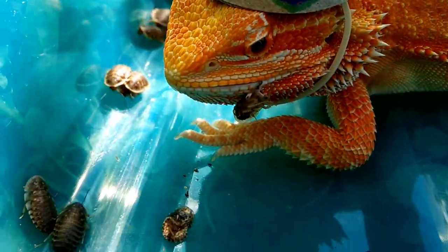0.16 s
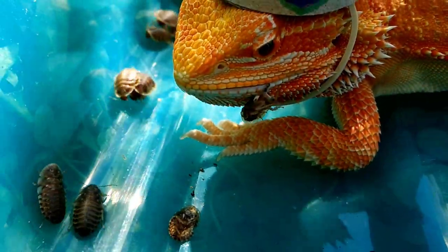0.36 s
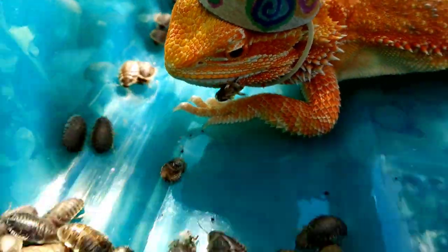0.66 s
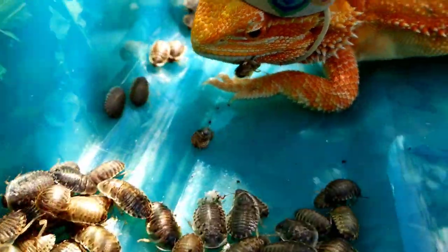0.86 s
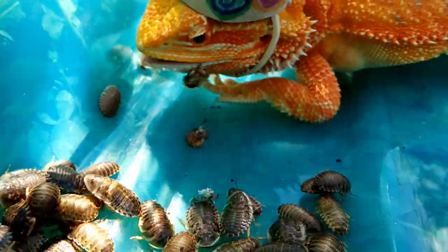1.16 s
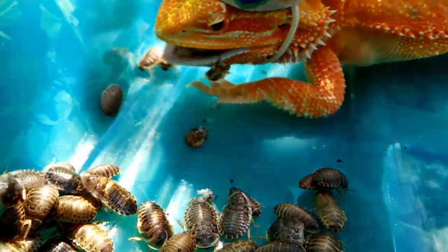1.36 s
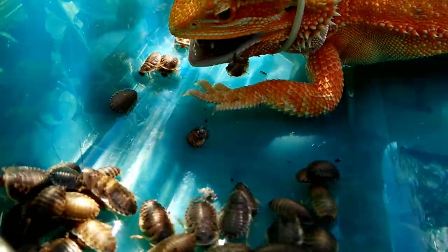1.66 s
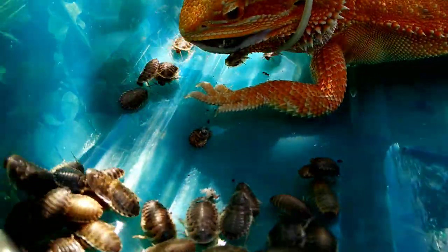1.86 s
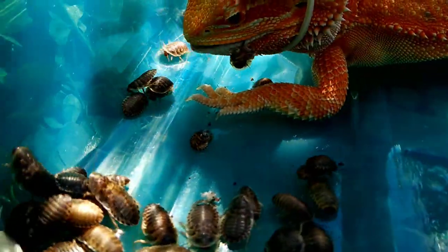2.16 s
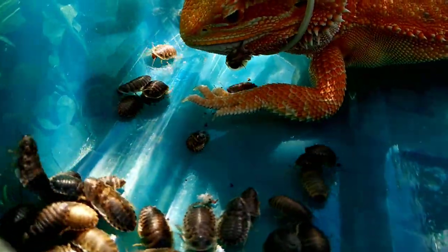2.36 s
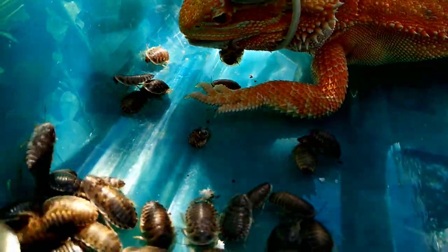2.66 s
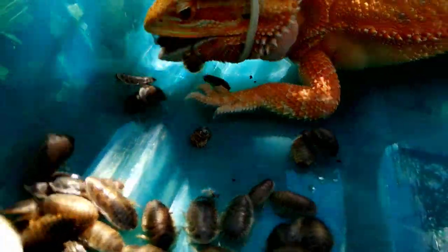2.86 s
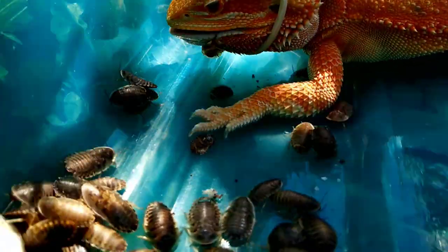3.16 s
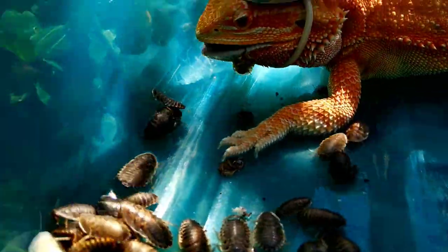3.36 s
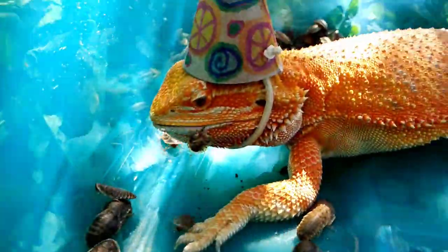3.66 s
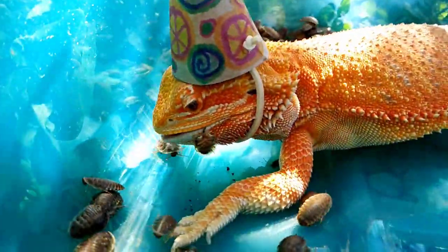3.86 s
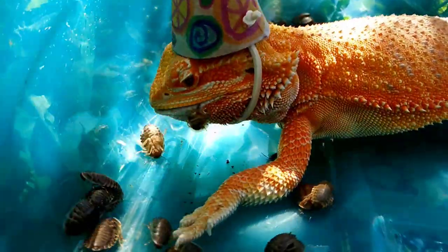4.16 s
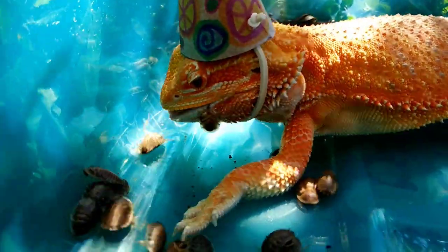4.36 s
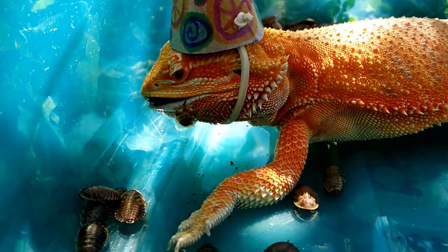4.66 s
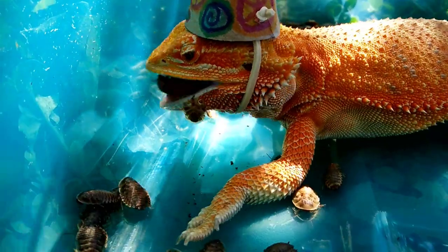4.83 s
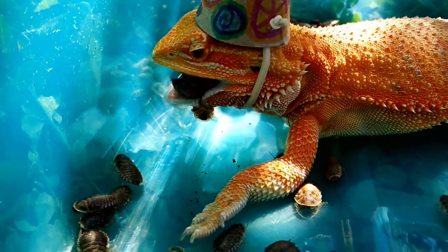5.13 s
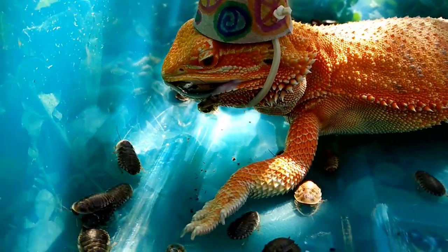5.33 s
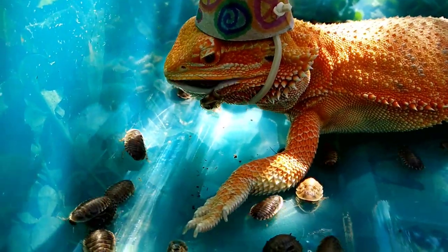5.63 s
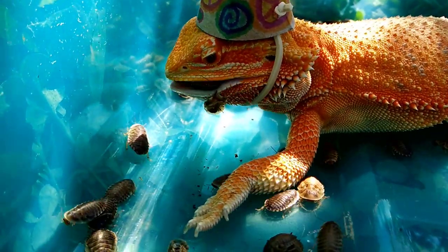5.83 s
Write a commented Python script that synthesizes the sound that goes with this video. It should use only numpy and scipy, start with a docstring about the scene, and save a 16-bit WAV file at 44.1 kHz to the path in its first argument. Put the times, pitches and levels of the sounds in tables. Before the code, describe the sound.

Faint insect leg ticks patter continuously on plastic near a hand-held camera. Crisp shell cracks come singly and in tight pairs, clustering just after three seconds, when fingers also thump and scrape the camera body. Isolated snaps return near five seconds. The quiet indoor room sounds small and dry, with soft microphone hiss, a low rumble and uneven handling noise between the channels.

```python
"""Plastic tub, close to a hand-held camera: a lizard crunches hard-shelled insects while others scuttle about.
Cracks and leg ticks are noise bursts and tiny impacts ringing shell and tub-wall resonances.
Fingers knock the camera body (pulse plus low thump), mostly near one microphone port, and rub it (lumpy noise).
Shaped noise gives the room rumble and the microphone hiss."""
import sys
import numpy as np
from scipy import signal
from scipy.fft import rfft, irfft, next_fast_len
from scipy.io import wavfile
from scipy.ndimage import uniform_filter1d, map_coordinates

SR = 44100
rng = np.random.default_rng(int(sys.argv[2]) if len(sys.argv) > 2 else 0)


def decibels_to_gain(level_db):
    """Convert a level in decibels to a linear amplitude gain (20 dB per decade)."""
    exponent = np.asarray(level_db, float) / 20
    return 10 ** exponent


def put_to_file(sound):
    """Save the sound as 16-bit audio at rate SR, in the file named by the first command-line argument."""
    columns = np.atleast_2d(sound).T  # one column per channel
    safe = np.clip(columns, -1, 1)
    whole_steps = np.round(safe * 32767)
    wavfile.write(sys.argv[1], SR, whole_steps.astype(np.int16))


N = 264379

# room rumble spectrum: (frequency [Hz], relative level [dB])
RUMBLE_SPECTRUM = [(18, -60.5), (30, -18.5), (77, 1.5), (108, 4.5), (237, -14.5), (377, -16), (447, -16.5),
                   (530, -32), (732, -13), (1040, -32), (1200, -43.5), (1560, -64.5), (2640, -120)]
# rumble, left-right correlation: (frequency [Hz], correlation [-1..1])
RUMBLE_LIKENESS = [(60, 0.6), (250, 1), (750, 0.83)]
# thuds of the hand, spectrum: (frequency [Hz], relative level [dB])
THUD_SPECTRUM = [(18, -46.5), (30, -35), (46, -12), (75, 2), (119, -12), (179, -6), (216, -7.5), (400, -39),
                 (520, -50.5), (880, -120)]
# skin rubbing plastic, spectrum: (frequency [Hz], relative level [dB])
RUB_SPECTRUM = [(150, -27), (250, -9.5), (583, -2), (1240, -12), (1860, -20.5), (2920, -25.5), (4000, -24),
                (5200, -27.5), (8800, -120)]
# fingers sliding on the camera: (start [s], length [s], rub level [dB], left-right [dB])
STROKES = [(0.49, 0.3, -58.5, -1), (3.32, 0.093, -54.5, -5.5), (3.483, 0.038, -52, -3),
           (3.556, 0.14, -45, -15.5), (3.773, 0.021, -53, -5), (4.256, 0.018, -59.5, -1),
           (4.316, 0.06, -52.5, -12)]
# insect legs and grinding jaws: (time [s], bright level [dB], dull level [dB], left-right [dB])
SCUTTLE = [(0.0, -69.5, -84, -4), (0.4, -69.5, -87, -10), (0.65, -67.5, -78, 2.5), (1.13, -69, -77, -12.5),
           (1.17, -64, -64, -2), (1.27, -64, -63.5, 1), (1.33, -67.5, -74.5, -1), (2.08, -65.5, -80, -3.5),
           (2.64, -69.5, -96, -6), (2.98, -64.5, -68, -4), (3.26, -67.5, -67, -1), (3.3, -52, -69, 3),
           (3.43, -65.5, -80, -1), (3.55, -62, -72, 0), (3.87, -68, -69, 1.5), (4.15, -68.5, -76, -2),
           (4.34, -66.5, -59, -2.5), (4.6, -67, -78, -8), (4.7, -62, -64, -2), (4.85, -68, -75.5, -5),
           (5.22, -64, -70.5, -5), (5.99, -70, -72.5, -6)]
# dense bed of leg ticks, spectrum: (frequency [Hz], relative level [dB])
LEG_BED_SPECTRUM = [(1650, -42.5), (2800, -1.5), (3400, -6), (4920, 4), (5320, 4.5), (6350, 3),
                    (7510, -6.5), (8040, -24), (9350, -12.5), (9750, -42), (12700, -71), (21400, -120)]
# shell resonances: (centre [Hz], width [Hz], level [dB])
SHELL_MODES = [(3440, 1100, -1), (4214, 286, 5.5), (5075, 280, -1), (5870, 350, 2), (6330, 2600, -4.5)]
# dull tub-wall resonances: (centre [Hz], width [Hz], level [dB])
TUB_MODES = [(414, 51, 4), (777, 113, 2.5), (1423, 57, -0.5), (1826, 117, -3.5), (2430, 303, -2),
             (3005, 410, -10)]
# finger knocks on the camera body:
# (time [s], pulse peak [dB], nominal pulse pitch [Hz], thump level [dB], left-right [dB])
KNOCKS = [(0.303, -42.5, 570, -42.5, -36), (0.503, -45, 540, -39, -26), (0.5796, -33.5, 744, -46.5, -40),
          (0.6146, -27, 1050, -35, 6.5), (0.765, -34.5, 324, -39, 12), (2.3831, -31, 1080, -26.5, -25),
          (3.4454, -26, 323, -24, 2.5), (3.4962, -32.5, 440, -31, -35), (3.5033, -30, 685, -36.5, -4.5),
          (3.5715, -15.5, 1060, -34.5, -29), (3.6369, -31, 580, -27.5, -13), (3.7043, -21, 530, -39, -7),
          (3.7696, -16, 576, -32.5, -6.5), (3.7838, -29, 565, -40, -22), (4.2927, -39.5, 1200, -58, -3),
          (4.3116, -32.5, 560, -44, -30), (4.384, -20.5, 680, -30.5, -20), (5.016, -39, 520, -47, -44),
          (5.1504, -39.5, 450, -45.5, -33)]
# shells cracking and claws or nails ticking:
# (time [s], bright peak [dB], dull peak re bright [dB], ring pitch [Hz], left-right [dB])
CRACKS = [(0.6144, -24.5, -11.5, 4830, 49), (0.764, -47.5, -0.5, 5540, 14), (1.0122, -52.5, 7.5, 4450, 6),
          (1.065, -42, -4, 6020, -4), (1.1566, -46.5, 4, 4130, 1.5), (1.182, -57, 14.5, 5100, 7),
          (1.229, -47.5, 1, 5200, 8), (1.2439, -44.5, 2, 4100, -29), (1.2957, -40.5, -26, 4700, 9),
          (1.542, -40.5, -19.5, 5080, 14), (1.548, -32.5, -16, 4820, 3.5), (1.771, -58, 6.5, 3430, -1),
          (1.836, -50.5, 0, 3500, 3), (1.8711, -27, -24, 5000, 6), (1.8757, -30.5, -24, 4330, 8.5),
          (1.8947, -45, -2, 3870, -7), (1.9069, -23, -6, 4180, 3.5), (2.336, -37, -14, 3800, 8),
          (2.765, -44, -33, 5800, 1), (2.973, -42, -5.5, 4740, -4), (2.9845, -36.5, 0.5, 4250, 0.5),
          (3.274, -43, 8, 3520, -5), (3.285, -22, -22, 5360, 6.5), (3.2952, -25.5, -16, 5230, -3.5),
          (3.3114, -35, -17, 4500, -5), (3.3288, -36.5, -4, 5040, 12), (3.3468, -23.5, -9, 5050, 3.5),
          (3.5029, -30, -2, 4300, -7), (3.5686, -33.5, 10, 3530, -15), (3.613, -35, -10, 5960, 2),
          (3.702, -21.5, -5.5, 4260, 9), (3.7689, -32.5, 1, 6700, 16.5), (4.161, -49, -4.5, 4400, 10),
          (4.309, -38, 12, 3250, -2), (4.3824, -25.5, -7, 4560, -5), (4.4324, -39.5, -15, 5600, -5),
          (5.04, -43, -4.5, 4320, 8), (5.065, -23, -9, 4780, 2), (5.3741, -26, -11, 5500, -1.5),
          (5.3796, -29, -10, 4500, -3), (5.4279, -42.5, 4.5, 3240, 3), (5.745, -46.5, -20, 4220, 1)]
# overall response, with a dip near 8 kHz: (frequency [Hz], gain [dB])
OVERALL_RESPONSE = [(28, -19), (50, -9), (100, -5), (6500, 2), (7500, -4), (8200, -16), (9000, -5),
                    (9800, -23.5)]

GRIP_DB, GRIP_PAN_DB = -69, -1.5  # resting grip
STROKE_ATTACK_S, STROKE_RELEASE_T60_S = 0.0093, 0.48
THUD_AT_REST_DB, THUD_DB_PER_RUB_DB = -61, 0.74
# nominal thump pitch when pulse and thump match; it doubles per this many dB of pulse over thump
THUMP_HZ, THUMP_DOUBLES_DB = 149, 24.5
THUMP_T60_CYCLES = 13  # nominal
# spray decay at -35 dB before limits; halves per this many dB louder; halves at this left-right level
SPRAY_T60_S, SPRAY_HALVES_DB, NEAR_PORT_DB = 0.2, 8.5, 6
FAINT_PER_S = 4
FAINT_OVER_BUSTLE_DB, FAINT_DULL_DB, FAINT_HZ = 17, -10.5, 4900  # central values


def unit(x):
    """Scale to rms 1."""
    return x / np.sqrt(np.mean(x ** 2) + 1e-20)


def peak(x):
    """Scale to peak 1."""
    return x / np.abs(x).max()


def along(points, hz):
    """Interpolate (Hz, value) points on a log frequency axis."""
    f, v = np.transpose(points)
    return np.interp(np.log(hz + 1), np.log(f + 1), v)


def curves(rows):
    """One value per sample for each column after the time."""
    s, *cols = np.transpose(rows)
    return [np.interp(np.arange(N) / SR, s, c) for c in cols]


def wobble(knots_per_s):
    """Smooth random curve through normal knots."""
    knots = rng.standard_normal(int(N * knots_per_s / SR) + 4)
    return map_coordinates(knots, [np.arange(N) * knots_per_s / SR])


def filtered(x, response):
    """Apply a complex response of frequency."""
    m = next_fast_len(x.shape[-1] + 8192)
    spectrum = rfft(x, m) * response(np.fft.rfftfreq(m, 1 / SR))
    return irfft(spectrum, m)[..., :x.shape[-1]]


def resonances(modes):
    """Causal sum of (Hz, width Hz, dB) resonances of alternating sign."""
    def response(f):
        return sum((-1) ** k * decibels_to_gain(db) * 1j * f * w / (c * c - f * f + 1j * f * w)
                   for k, (c, w, db) in enumerate(modes))
    return response


def sides(pan_db):
    """Left and right gains of mean 1."""
    pair = decibels_to_gain(np.array([pan_db / 2, -pan_db / 2]))
    return 2 * pair / pair.sum(axis=0)


def add(track, s, sound):
    """Mix a short stereo sound in at s seconds."""
    track[:, round(s * SR):][:, :sound.shape[1]] += sound


def rush(spectrum, likeness, patchy_db):
    """Stereo noise of rms 1: random-gain time-frequency patches, given spectrum and left-right correlation."""
    z = signal.stft(rng.standard_normal((2, N)), nperseg=512)[2]
    field = uniform_filter1d(rng.standard_normal(z.shape[1:]), size=6, axis=0)
    field = uniform_filter1d(field, size=8, axis=1)
    pair = signal.istft(z * decibels_to_gain(patchy_db * unit(field)), nperseg=512)[1][:, :N]

    def mid_side_response(hz):
        angle = np.arccos(np.clip(along(likeness, hz), -1, 1)) / 2
        return decibels_to_gain(along(spectrum, hz)) * [np.cos(angle), np.sin(angle)]

    mid, side = filtered(pair, mid_side_response)
    return unit(np.array([mid + side, mid - side]))


def grains(hits_per_s, clump_db, modes):
    """Clumped tiny impacts of uneven size, each port its own, through resonances; rms 1."""
    hits = rng.random((2, N)) < hits_per_s / SR * decibels_to_gain(clump_db * wobble(25))
    sizes = rng.standard_normal((2, N)) * decibels_to_gain(3.3 * np.minimum(rng.exponential(size=(2, N)), 3))
    return unit(filtered(hits * sizes, resonances(modes)))


def hiss_and_rumble():
    """Steady microphone hiss, nearly unrelated between ports; room rumble, largely shared by them."""
    hiss_spectrum = [(200, -4), (1000, -6.5), (4000, -14.5), (9000, -10.5), (10000, -7)]
    hiss = decibels_to_gain(-68.5) * rush(hiss_spectrum, [(1000, .01)], patchy_db=0.5)
    rumble = decibels_to_gain(-57.0) * rush(RUMBLE_SPECTRUM, RUMBLE_LIKENESS, patchy_db=1.0)
    return hiss + rumble * sides(-5.4)[:, None]


def hand():
    """Low lumpy thuds and a grainy rub of skin on plastic, carried through the body to each port differently."""
    t = np.arange(N) / SR
    level = decibels_to_gain(GRIP_DB) * sides(GRIP_PAN_DB)[:, None] * np.ones(N)
    for s, length_s, db, pan_db in STROKES:
        attack = np.clip((t - s) / STROKE_ATTACK_S + 1, 0, 1)  # full at s
        release = decibels_to_gain(-60 * np.maximum(t - s - length_s, 0) / STROKE_RELEASE_T60_S)
        level = np.hypot(level, decibels_to_gain(db) * attack * release * sides(pan_db)[:, None])
    thud = unit(decibels_to_gain(1.7 * wobble(25)) * rush(THUD_SPECTRUM, [(100, 0.64)], patchy_db=3.0))
    slips = decibels_to_gain(2.34 * wobble(35) + 2.54 * wobble(250))
    rub = unit(slips * rush(RUB_SPECTRUM, [(500, 0.2)], patchy_db=3.5))
    thud_level = decibels_to_gain(THUD_AT_REST_DB) * (level / decibels_to_gain(GRIP_DB)) ** THUD_DB_PER_RUB_DB
    return thud * thud_level + rub * level


def scuttle():
    """Leg ticks ring the shells over a dense bed of the same; heavier ones sound the tub wall."""
    bright_db, dull_db, pan_db = curves(SCUTTLE)
    bed = rush(LEG_BED_SPECTRUM, [(1000, .05)], patchy_db=1.3) * decibels_to_gain(1.6 * wobble(30))
    bright = decibels_to_gain(bright_db) * (bed + .5 * grains(810, 2.6, SHELL_MODES))
    dull = decibels_to_gain(dull_db + 5.1 * wobble(5.3)) * grains(1500, 1.5, TUB_MODES)
    return (bright + dull) * sides(pan_db)


def faint_ticks():
    """Rows like CRACKS for many small ticks at chance moments, louder when the tub is busy."""
    size, dull, pitch, side = rng.standard_normal((round(FAINT_PER_S * N / SR), 4)).T
    s = .03 + (N / SR - .03) * rng.random(len(size))
    busy_db = curves(SCUTTLE)[0][(s * SR).astype(int)]
    peak_db = busy_db + FAINT_OVER_BUSTLE_DB + 1.38 * size
    return list(zip(s, peak_db, FAINT_DULL_DB + 7 * dull, FAINT_HZ * 2 ** (.2 * pitch), 5 * side))


def knocks():
    """A short pulse whose swing slows as the finger settles, and a low body thump; the far port hears it late."""
    out, t = np.zeros((2, N + SR)), np.arange(SR // 8) / SR
    for s, db, hz, thump_db, pan_db in KNOCKS:
        thump_hz = THUMP_HZ * 2 ** ((db - thump_db) / THUMP_DOUBLES_DB)
        lags_s = 0.00065 * np.array([[pan_db < 0], [pan_db >= 0]])
        age = np.maximum(t - lags_s, 0)
        turns = hz * age
        pulse = np.sin(2 * np.pi * turns ** 0.7) * turns ** 2.06 * np.exp(-turns / 0.18)
        rattle = rng.standard_normal(age.shape) * decibels_to_gain(-60 * age / 0.1) * (age > 0)
        rattle = filtered(rattle, resonances([(hz, 700, 0)]))
        thump = -np.sin(2 * np.pi * (thump_hz * age) ** 0.933)
        thump = thump * decibels_to_gain(-60 * age * thump_hz / THUMP_T60_CYCLES) * (1 - np.exp(-age / 0.00047))
        knock = decibels_to_gain(db) * (peak(pulse) + 0.048 * peak(rattle)) + decibels_to_gain(thump_db) * thump
        add(out, s, knock * sides(pan_db)[:, None])
    return out[:, :N]


def cracks():
    """The shell creaks, snaps and sheds a dying spray of splinters; modes near its ring pitch sound most."""
    out, lead_s = np.zeros((2, N + SR)), .02
    t = np.arange(SR // 6) / SR - lead_s
    age = np.maximum(t, 0)
    for s, db, dull_db, hz, pan_db in CRACKS + faint_ticks():
        # harder snaps and ticks near one port die sooner
        t60_s = SPRAY_T60_S * 2 ** (-(db + 35) / SPRAY_HALVES_DB) / (1 + (pan_db / NEAR_PORT_DB) ** 2)
        t60_s = np.clip(t60_s, .015, .15)
        # unlike paths to the two ports: independent noise
        splinters = rng.standard_normal((2, len(t))) * decibels_to_gain(2.3 * rng.standard_normal((2, len(t))))
        hold = .12 * np.exp(-(age / (.07 * t60_s)) ** 2)  # shell keeps giving way for a few ms
        spray = .13 * decibels_to_gain(-60 * age / t60_s)
        snap = (decibels_to_gain(-60 * age / .005) + hold + spray) * (1 - np.exp(-age / .0005))
        creak = 0.039 * decibels_to_gain(60 * np.minimum(t, 0) / (0.82 * t60_s)) * (t < 0)  # swells before the snap
        burst = splinters * (snap + creak)
        spread = 1 + (pan_db / 12) ** 2  # a tick right at one port is broader than a far crack
        shell = [(c, w, level - 12 / spread * abs(np.log2(c / hz))) for c, w, level in SHELL_MODES]
        ring = filtered(burst, resonances([(hz, 500, 0)]))
        bright = filtered(burst, resonances(shell)) + 0.74 / spread * ring
        bright = filtered(bright, resonances([(hz, 1900 * spread, 0)]))  # steepens the skirts
        chances = rng.standard_normal(len(TUB_MODES))
        wall = [(c, w, level + 3 * chance) for (c, w, level), chance in zip(TUB_MODES, chances)]
        dull = filtered(burst, resonances(wall))
        crack = decibels_to_gain(db) * (peak(bright) + decibels_to_gain(dull_db) * peak(dull))
        add(out, s - lead_s, crack * sides(pan_db)[:, None])
    return out[:, :N]


def scene():
    """All sources at the two ports."""
    return hiss_and_rumble() + hand() + scuttle() + knocks() + cracks()


def low_pass(x):
    """Removes everything above the highest recorded frequency."""
    return signal.sosfilt(signal.butter(12, 9900, fs=SR, output="sos"), x)


def record(dry):
    """The sound loses the deepest bass and the high treble, and dips near 8 kHz."""
    mix = filtered(dry, lambda hz: decibels_to_gain(along(OVERALL_RESPONSE, hz)))
    return low_pass(mix)


dry = scene()
out = record(dry)
put_to_file(out)
```